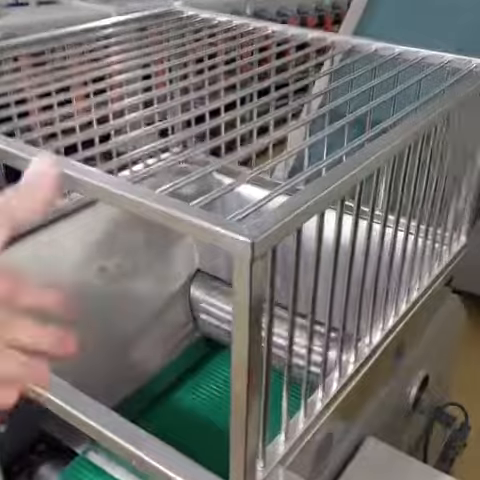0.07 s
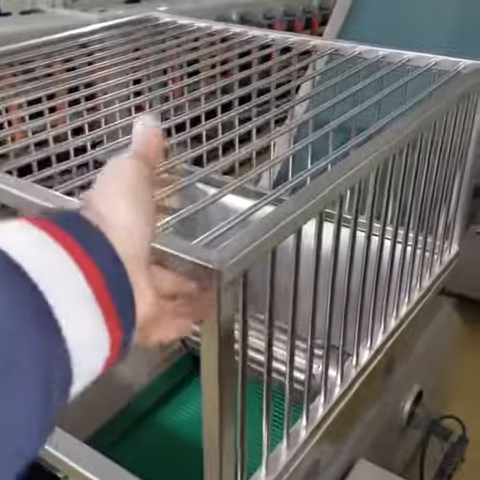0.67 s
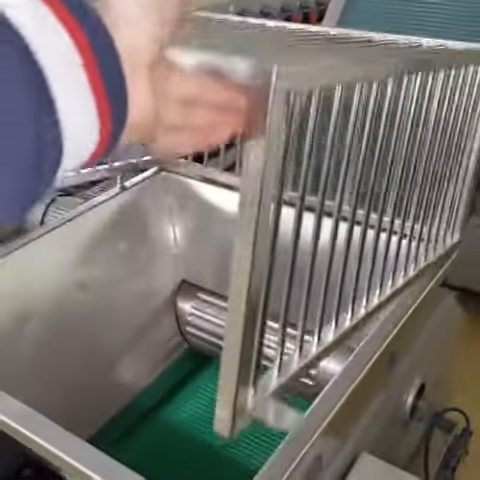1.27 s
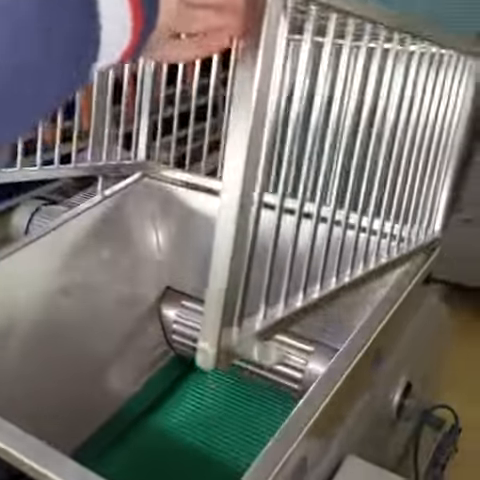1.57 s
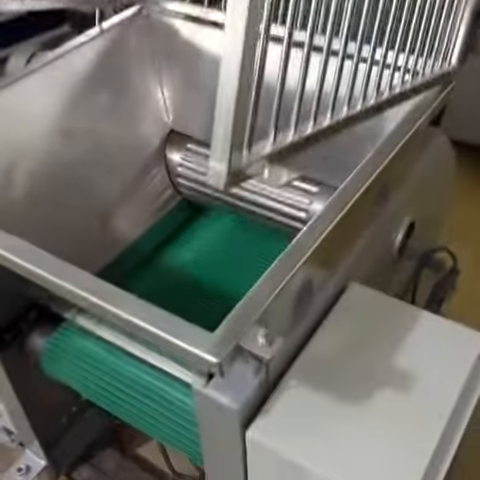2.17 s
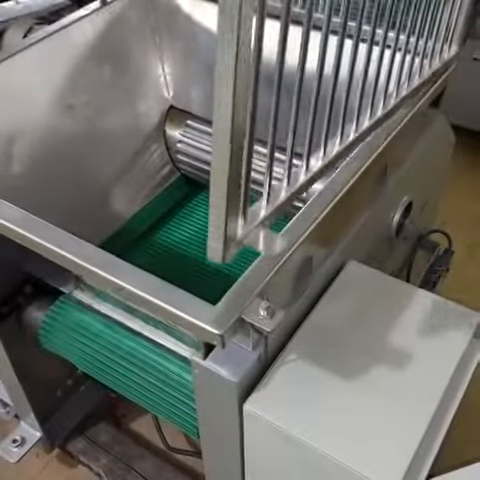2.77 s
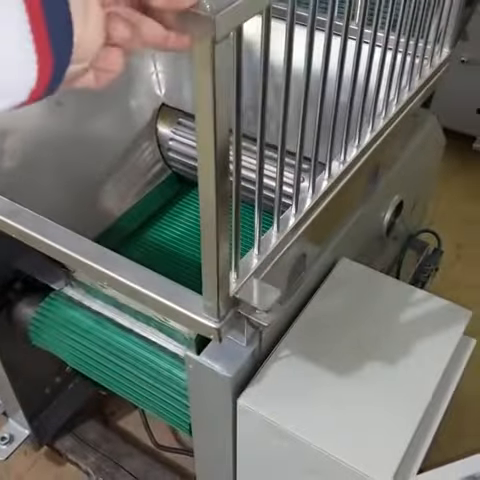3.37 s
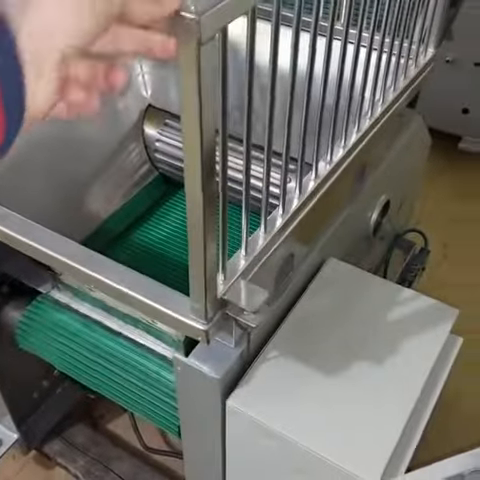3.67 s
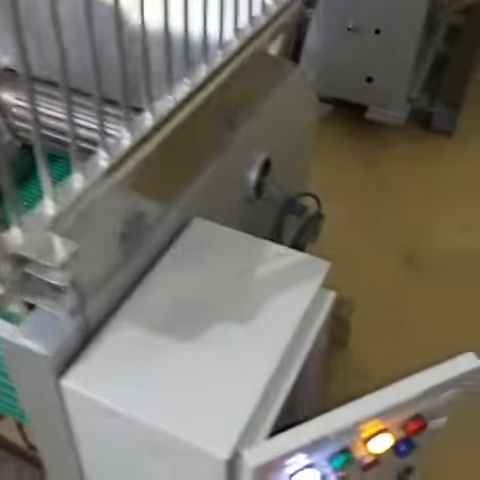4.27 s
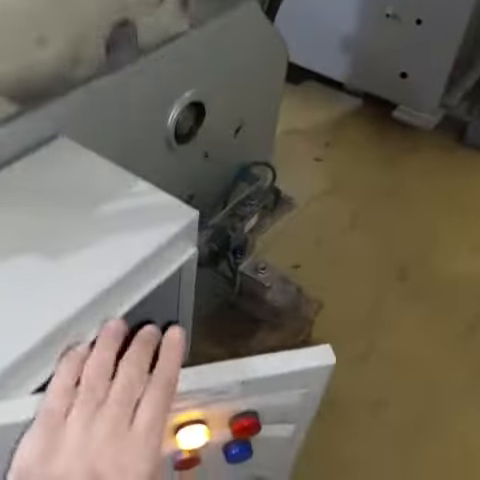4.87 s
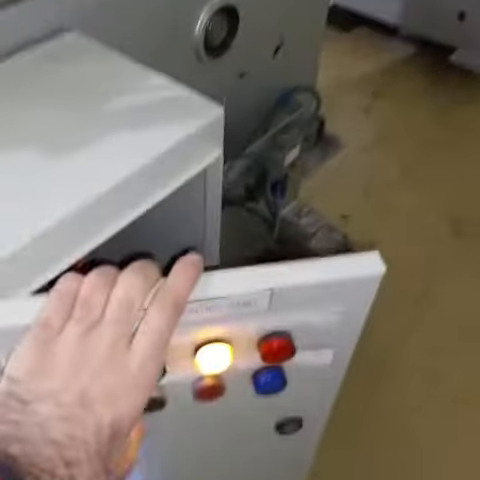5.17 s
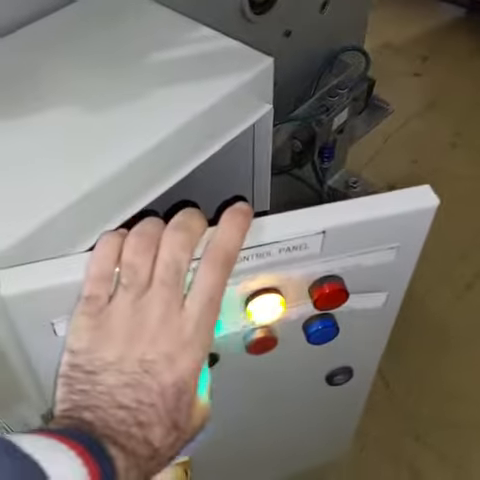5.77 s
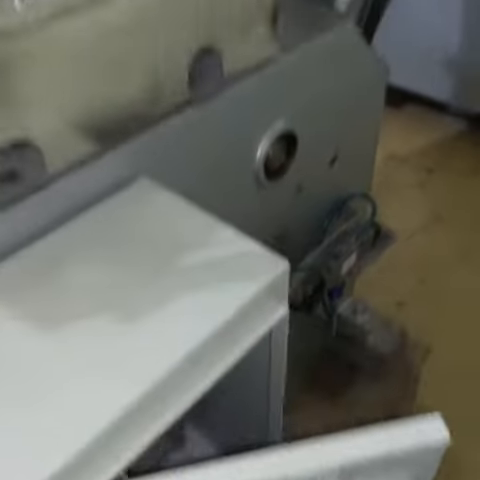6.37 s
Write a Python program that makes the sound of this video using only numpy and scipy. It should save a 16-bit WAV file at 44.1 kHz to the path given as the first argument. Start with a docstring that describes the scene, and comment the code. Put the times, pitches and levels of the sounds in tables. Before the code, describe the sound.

An industrial machine hums close by in a hard-walled workshop, with a jacket sleeve brushing past and a light rasp from the belt. At about 0.9 seconds a contactor snaps out, leaving a bright, noisy ring and a low thump, and the drive coasts to rest by 1.5 seconds. Quiet room rumble and distant motors remain. A faint hiss comes briefly around 2.8 seconds. At 3.1 seconds a barred steel guard falls shut with a loud clang, rebounds lightly and rings for over a second. The sleeve swishes again at 3.5 seconds. A low mains hum swells around 4.6 seconds, and from 5.2 seconds the faint hiss returns with a thin whistle inside it. At 5.8 seconds a push button clicks, the contactor clacks in and the drive growls back up to speed, humming on with a little cloth rustle until about 6.5 seconds.

```python
"""A laminating machine hums in a hard-walled workshop; a sleeve brushes past and the belt rubs its guide.
As the steel guard is lifted the contactor snaps out, a bright, noisy ring with a low thump dies away
and the drive coasts down. A faint hiss switches on and off, then the guard falls shut with a long clang.
The sleeve brushes again, mains hum swells and the hiss returns, a thin whistle growing inside it.
A push button clicks, the contactor pulls in and the drive growls back up to speed."""
import sys
import numpy as np
from scipy import signal
from scipy.fft import rfft, irfft, next_fast_len
from scipy.io import wavfile

SR = 44100
rng = np.random.default_rng(int(sys.argv[2]) if len(sys.argv) > 2 else 0)


def waveform_to_disk(signal):
    """Save audio, clipped to [-1, 1], as 16-bit WAV at the path in sys.argv[1]."""
    frames = np.transpose(np.atleast_2d(signal))
    scaled = np.clip(frames, -1, 1) * 32767
    samples = np.round(scaled).astype(np.int16)
    wavfile.write(sys.argv[1], SR, samples)


N = 283563
TIME = np.arange(N) / SR
CUT_S, RESTART_S = .93, 5.82  # the drive loses power and gets it back
# how alike the hall sounds left and right: f/Hz, likeness/0-1
STEREO_LIKENESS = [(60, 0.99), (250, 0.92), (450, 0.87), (900, 0.09), (1800, 0.01), (15000, 0.1)]


def amp(db):
    """Decibels to gain."""
    return 10 ** (np.asarray(db) / 20)


def unit(x):
    """Scales to rms 1."""
    return x / np.sqrt(np.mean(x ** 2) + 1e-20)


def read(points, hz):
    """Reads a curve on a log-frequency axis."""
    f, value = np.transpose(points)
    return np.interp(np.log(hz + 1), np.log(f + 1), value)


def add(mix, s, sound):
    """Mixes a sound in at time s."""
    part = mix[:, round(s * SR):][:, :sound.shape[1]]
    part += sound[:, :part.shape[1]]


def swell(peak_s, rise_s, fall_s):
    """A rounded swell of height 1 with exponential flanks."""
    t = TIME - peak_s
    return 1 / np.cosh(np.minimum(abs(t) / np.where(t < 0, rise_s, fall_s), 60))


def onset(s, rise_s):
    """An attack that climbs from 0 towards 1 after time s."""
    return 1 - np.exp(-np.maximum(TIME - s, 0) / rise_s)


def fade(t, t60):
    """Exponential decay, 60 dB down at t60."""
    return np.exp(-np.log(1000) * t / np.maximum(t60, 1e-3))


def drift(rate_hz):
    """Smooth random modulation of rms 1."""
    n = next_fast_len(N // 32)
    hz = np.fft.rfftfreq(n, TIME[-1] / n)
    slow = irfft(rfft(rng.standard_normal(n)) * np.exp(-(hz / rate_hz) ** 2), n)
    return np.interp(TIME, np.linspace(0, TIME[-1], n), unit(slow))


def noise(spectrum, size=N):
    """Coloured stereo noise of rms 1, centred in the bass and wide in the treble."""
    n = next_fast_len(size)
    hz = np.fft.rfftfreq(n, 1 / SR)
    a, b = rfft(rng.standard_normal((2, n)))
    same = np.clip(read(STEREO_LIKENESS, hz), -1, 1)
    low_cut = 1 / np.sqrt(1 + (spectrum[0][0] / (hz + 1)) ** 12)
    pair = np.array([a, same * a + np.sqrt(1 - same ** 2) * b])
    return unit(irfft(pair * amp(read(spectrum, hz)) * low_cut, n)[:, :size])


def tone(hz, t, wander=0):
    """A stereo sine of rms 1, wider in the treble; wander bends its phase, in radians."""
    apart = np.arccos(np.clip(read(STEREO_LIKENESS, hz), -1, 1)) * rng.choice([-1, 1])
    return np.sqrt(2) * np.sin(2 * np.pi * (hz * t + rng.random()) + wander + np.array([[0], [apart]]))


def panels(x, share, count=8):
    """Flat steel panels close by throw early echoes that comb the treble."""
    size = x.shape[1]
    n = next_fast_len(size)
    hz = np.fft.rfftfreq(n, 1 / SR)
    delay_s = rng.uniform(.0006, .012, (count, 2, 1))
    sign = rng.choice([-1, 1], (count, 2, 1))
    echoes = (sign * np.exp(-2j * np.pi * hz * delay_s)).sum(0) / np.sqrt(count)
    mirrored = share * hz / (hz + 900)  # long waves bend round the panels
    return irfft(rfft(x, n) * (1 + mirrored * echoes) / np.sqrt(1 + mirrored ** 2), n)[:, :size]


def burst(spectrum, t60, rise_s):
    """A noise transient: hard parts chatter for an instant as they meet."""
    t = np.arange(SR // 2) / SR
    return noise(spectrum, size=len(t)) * fade(t, t60) * (1 - np.exp(-t / rise_s))


def struck(modes, rise_s):
    """The strong modes of a struck body: two seconds of dying sines."""
    t = np.arange(2 * SR) / SR
    return sum(amp(db) * tone(hz, t) * fade(t, t60) for hz, db, t60 in modes) * (1 - np.exp(-t / rise_s))


def ring(spectrum, t60s, rise_s):
    """The many weak modes of a steel body merge with the hall; each band dies at its own rate."""
    t = np.arange(2 * SR) / SR
    wash = panels(noise(spectrum, size=len(t)), share=.7)
    hz, frame_s, bands = signal.stft(wash, SR, nperseg=512)
    bands = bands * fade(frame_s, read(t60s, hz)[:, None])
    tail = signal.istft(bands, SR)[1][:, :len(t)]
    return tail * (1 - np.exp(-t / rise_s))


def workshop():
    """Room tone: hall rumble, far motors that dip once, mains hum as the control cabinet passes close."""
    # drone of distant motors: f/Hz, level/dB
    far_motors = [(75.4, -46.5), (215.3, -51.5), (274.5, -56)]
    # noise spectrum of the hall: f/Hz, level/dB
    rumble = [(33, -6), (45, -4.5), (75, -4.5), (110, -8.5), (160, -12.5), (210, -10.5), (282, -13),
              (400, -19.5), (686, -30.5), (1000, -34), (2100, -42), (3200, -51.5), (4300, -54.5),
              (5900, -68.5), (9000, -63.5), (15500, -64)]
    motors = sum(amp(db) * tone(hz, TIME, 0.86 * drift(4.7)) for hz, db in far_motors)
    nearness = swell(peak_s=4.65, rise_s=.27, fall_s=.33)
    mains = amp(-35.5) * nearness * tone(47.5, TIME, 0.085 * drift(1.9))
    lull = swell(peak_s=3.76, rise_s=.22, fall_s=.3)
    hall = panels(noise(rumble), share=0.88) * amp(-41 + 0.5 * lull)
    return hall + motors * amp(-14 * lull) + mains


def drive():
    """The drive labours up to speed, turns steadily and coasts to rest when the power is cut."""
    # runs, the first already under way: on/s, off/s, hum/dB, whine/dB, shake/dB, treble/dB
    runs = [(-3.5, CUT_S, -31, -50.5, -70, -40), (RESTART_S, 7, -33, -62, -29.5, -35)]
    current_run = np.searchsorted([run[0] for run in runs], TIME) - 1
    on_s, off_s, hum_db, whine_db, shake_db, treble_db = np.array(runs)[current_run].T
    spin_up_s, coast_s = 0.15, 0.55
    speed = onset(on_s, spin_up_s) * np.clip(1 - (TIME - off_s) / coast_s, 0, 1)
    strain = onset(on_s, 0.036) * (1 - onset(on_s, 0.19))
    rub = swell(peak_s=.48, rise_s=.32, fall_s=.11) * speed  # the belt touches its guide once
    return (gears(speed, strain, rub, treble_db) + drop_out_ring(off_s)
            + motor(speed, strain, hum_db, shake_db) + bearing_and_belt(speed, rub, whine_db))


def gears(speed, strain, rub, treble_db):
    """Rolling noise brightens with speed and belt rub; the gears growl under strain."""
    # noise spectrum of running gears and rollers: f/Hz, level/dB
    rollers = [(110, -16.5), (165, -20), (206, -8), (260, -12), (330, -8.5), (400, -17), (620, -25.5),
               (1000, -27), (2600, -32.5), (3200, -36), (4400, -33.5), (6600, -49), (9000, -45),
               (15500, -50.5)]
    # noise spectrum of gears straining to get moving: f/Hz, level/dB
    straining_gears = [(120, -4), (190, 1), (260, 1), (330, -1.5), (450, -8), (800, -6), (1200, -16.5),
                       (1800, -36), (4000, -45), (9000, -38), (15000, -48)]
    rolling = panels(noise(rollers), share=1.0) * amp(0.95 * drift(39))
    dull = signal.sosfiltfilt(signal.butter(2, 1500, fs=SR, output="sos"), rolling)
    body = dull * amp(-34.5) * speed ** 0.79
    treble = (rolling - dull) * (amp(treble_db) * speed ** 3.1 + amp(-31.5) * rub)
    growl = amp(-22) * strain * panels(noise(straining_gears), share=0.75) * amp(1.1 * drift(41))
    return (body + treble + growl) * amp([[-1.5], [1.2]])  # panned a little right


def motor(speed, strain, hum_db, shake_db):
    """The motor's hum swells once and wavers under strain; the frame shakes as it takes up load."""
    # steady tones of the running drive: f/Hz, level/dB
    partials = [(107.7, -45), (205, -39.5), (430.7, -51.5), (538.3, -55), (936.7, -58.5), (990.5, -55),
                (1227, -62), (1335, -70), (1410, -56), (1997, -64), (2213, -67), (3790, -61), (4285, -72)]
    hum_hz, shake_hz = 322.5, 55.8
    wander = 0.044 * drift(11) + 0.5 * np.sqrt(strain) * drift(23.7)
    swell_db = 7.5 * swell(peak_s=.73, rise_s=.35, fall_s=.1)
    hum = amp(hum_db + swell_db) * speed ** 0.74 * tone(hum_hz, TIME, wander)
    tones = speed ** 0.98 * sum(amp(db) * tone(hz, TIME, 0.31 * drift(6.1)) for hz, db in partials)
    shake = amp(shake_db) * speed ** 3.1 * tone(shake_hz, TIME, 0.11 * drift(6))
    return hum * amp([[-2.0], [1.6]]) + tones + shake


def bearing_and_belt(speed, rub, whine_db):
    """Near full speed a bearing sings in quick uneven pulses; the belt rasps where it rubs."""
    # narrow noise band of the belt on its guide: f/Hz, level/dB
    rasp_band = [(1200, -56), (1850, -14), (2150, -5), (2450, -13), (3000, -27), (8000, -50)]
    whine_hz = 2655
    flutter = 1 + 0.88 * np.tanh(1.7 * drift(35))
    whine = amp(whine_db) * speed ** 4 * tone(whine_hz, TIME, 0.99 * drift(31)) * flutter
    rasp = noise(rasp_band) * amp(-45.5) * rub * amp(2.1 * drift(45))
    return (whine + rasp) * amp([[-4], [2]])  # panned right


def sleeve():
    """Cloth slides in small uneven slips, one swell for each move of the arm."""
    # moves of the arm, timed at their fastest: t/s, rise/s, fall/s, level/dB
    arm_moves = [(.2, .11, 0.074, -44.5), (0.801, 0.13, 0.14, -49), (1.75, 0.36, 0.33, -69.5),
                 (2.15, 0.12, 0.23, -80), (3.51, 0.042, 0.1, -41), (3.73, 0.025, 0.038, -55),
                 (4.0, 0.062, 0.065, -74), (4.82, .23, 0.21, -56.5), (6.42, 0.21, .2, -46)]
    # noise spectrum of a jacket sleeve: f/Hz, level/dB
    cloth = [(400, 9), (1500, 7.5), (3000, 1), (5000, -0.5), (6300, -9), (7700, -5.5), (10000, -7),
             (12500, -1), (15500, -10)]
    moving = sum(amp(db) * swell(s, rise_s, fall_s) for s, rise_s, fall_s, db in arm_moves)
    return panels(noise(cloth), share=0.96) * moving * amp(drift(120))


def contactor():
    """The contactor snaps out, later in; each blow pings its springs and rings the control cabinet."""
    # blows: t/s, snap/dB, ring/dB, modes over the ring/dB
    blows = [(0.9204, -27, -32.5, 6), (0.9429, -22, -35, -5), (5.8125, -19, -28.5, 19.5),
             (5.819, -23.5, -33.5, 1)]
    # noise spectrum of the snapping contacts: f/Hz, level/dB
    snap = [(200, -15), (700, 11.5), (1500, 6.5), (1950, 6.5), (2350, 5), (3200, -0.5), (5100, 3.5),
            (6300, -5.5), (8700, -8), (10300, -9.5), (12500, -1.5), (15500, -21)]
    # pings of the steel contact springs: f/Hz, level/dB, t60/s
    springs = [(2330, 2, 0.055), (2370, -12, .08), (3040, -14, .06), (5140, -14, 0.055), (7100, -25, 0.073),
               (8250, -16, 0.05), (11900, -25, .06)]
    # strong modes of the cabinet: f/Hz, level/dB, t60/s
    modes = [(158.4, -24.5, 2.4), (187.7, -24, 1.2), (207, -45, 0.83), (295, -42, 1.3), (324, -29, 4.7),
             (365, -15.5, 0.17), (462, -41, 1.24), (530, -34, 2.1), (710, -34, 1.6), (806, -30, 1.9)]
    # tail of the cabinet ringing with the hall: f/Hz, level/dB
    tail = [(65, -45), (110, -21), (192, -4.5), (247, -3.5), (316, -1.5), (542, -22.5), (680, -18.5),
            (928, -21), (1170, -21), (1270, -15), (1840, -19.5), (5510, -26), (15500, -38)]
    # decay of that tail: f/Hz, t60/s
    decay = [(150, 1.4), (400, 1.13), (1500, 1.65), (4500, 1.27), (8000, 0.73), (14000, 1.22)]
    out = np.zeros((2, N))
    for s, snap_db, ring_db, modes_db in blows:
        add(out, s, amp(snap_db) * burst(snap, t60=0.071, rise_s=0.0014))
        add(out, s, amp(snap_db - 12.5) * struck(springs, rise_s=.0005))
        body = ring(tail, decay, rise_s=0.0017) + amp(modes_db) * struck(modes, rise_s=0.017)
        add(out, s, amp(ring_db) * body)
    return out


def ticks():
    """Contacts, latch and push button tick sharply as their small parts meet."""
    # tick cues: t/s, level/dB, t60/s
    cues = [(.9222, -38, 0.023), (.9438, -26, 0.019), (3.249, -36, .12), (3.258, -45, .1),
            (3.728, -55, 0.15), (5.0173, -63, 0.038), (5.2644, -66, 0.091), (5.7937, -30.5, 0.07),
            (5.8126, -18, 0.04), (6.029, -45, 0.28)]
    # noise spectrum of a tick: f/Hz, level/dB
    spectrum = [(500, -26), (1700, -8), (2400, -0.5), (3200, -22), (5000, -6), (8000, -5.5), (10500, -7),
                (12500, -4), (15500, -16)]
    out = np.zeros((2, N))
    for s, db, t60 in cues:
        add(out, s, amp(db) * burst(spectrum, t60, rise_s=0.00018))
    return out


def drop_out_ring(off_s):
    """A bright, noisy ring with a low thump dies away after the contactor snaps out."""
    # noise spectrum of the thump and ring: f/Hz, level/dB
    spectrum = [(130, -15), (200, 8), (300, 3), (500, -17), (1900, -16), (2900, -11), (4000, -14),
                (5200, -17.5), (6800, -51), (15000, -47)]
    envelope = onset(off_s, 0.006) * (1 - onset(off_s, 0.14))
    ringing = panels(noise(spectrum), share=0.8) * amp(1.8 * drift(90))
    return amp(-29.5) * envelope * ringing * amp([[-1.5], [1.2]])  # panned a little right


def faint_hiss():
    """A faint hiss switches on twice, with a thin whistle growing inside it."""
    # hiss cues: t/s, rise/s, length/s, level/dB
    cues = [(2.752, 0.01, 0.26, -56.5), (5.192, 0.065, .66, -55.5)]
    # noise spectrum of the hiss: f/Hz, level/dB
    hiss = [(300, -10), (900, 1.5), (1600, 0), (2250, 0.5), (3200, -2), (3750, -2), (4200, -4.5),
            (4600, -8.5), (5300, -12.5), (6200, -24), (9000, -25.5), (15000, -23)]
    # noise spectrum of the whistle: f/Hz, level/dB
    whistle = [(1600, -26.5), (1950, -16), (2150, -5), (2400, -14.5), (3400, -19), (3950, -7.5),
               (4200, -0.5), (4450, -11), (4720, -9), (5000, -25), (9000, -64.5)]
    release_s, grow_s = .08, .7
    hiss_gain, whistle_gain = 0, 0
    for s, rise_s, length_s, db in cues:
        envelope = onset(s, rise_s) * (1 - onset(s + length_s, release_s))
        hiss_gain += amp(db) * envelope
        whistle_gain += amp(-50.5) * envelope * onset(s, grow_s)
    return panels(noise(hiss), share=0.47) * hiss_gain + noise(whistle) * whistle_gain


def guard():
    """The barred steel guard clangs onto the frame, one corner first, and rebounds once."""
    # blows: t/s, contact/dB, ring/dB
    blows = [(3.077, -20.5, -37.5), (3.0803, -13, -17), (3.25, -30, -38.5)]
    # noise spectrum of the contact: f/Hz, level/dB
    crack = [(125, -7.5), (170, 6), (260, 11), (500, 0.5), (1000, 1), (2200, -0.5), (4000, -1), (7000, -8),
             (11000, -10.5), (15500, -8)]
    # strong modes of guard and frame: f/Hz, level/dB, t60/s
    modes = [(104.4, -36.5, 4.6), (153.6, -24, 1.57), (160.4, -20, 0.78), (186.6, -25.5, 1.1),
             (200, -18.5, 1.14), (221.2, -26, 3.2), (237, -23, 3.2), (300, -21.5, 1.78),
             (322.3, -24.5, 2.1), (331, -27.5, 2.17), (369.4, -21, 0.37), (377, -37.5, 0.78),
             (429, -32, 2.8), (484, -33, 2.2), (514, -46, 2.4), (538, -33, 1.9), (544, -44, 2.9),
             (691, -32, 1.62), (783, -37, 1.5), (740, -39.5, 0.89), (1246, -45.5, 0.97),
             (1427, -30.5, 0.76), (1515, -36, 1.7), (1780, -35.5, 0.54), (2320, -44, 0.71),
             (2805, -35.5, 1.1), (3200, -36, 0.57), (3160, -46, 1.0)]
    # short thud of the frame's heavy panels: f/Hz, level/dB, t60/s
    thud = [(174.6, -36, .45), (206.5, -11, 0.21), (308, -32.5, .4), (520, -16, 0.11), (800, -30, 0.86)]
    # tail of dense, weaker modes: f/Hz, level/dB
    tail = [(53, -41.5), (90, -25.5), (195, -4), (321, -6.5), (389, -6.5), (810, -14.5), (864, -18),
            (1450, -19), (1610, -20.5), (2770, -22), (3660, -28), (4950, -31), (9440, -41), (12500, -37.5),
            (15500, -48.5)]
    # decay of that tail: f/Hz, t60/s
    decay = [(120, 1.9), (240, 2.27), (350, 2.2), (700, 1.83), (1800, 1.645), (4800, 1.45), (8000, 1.46),
             (14000, 1.23)]
    out = np.zeros((2, N))
    for s, contact_db, ring_db in blows:
        add(out, s, amp(contact_db) * burst(crack, t60=0.18, rise_s=.0005))
        body = ring(tail, decay, rise_s=0.0025) + amp(15.5) * struck(modes + thud, rise_s=0.0015)
        add(out, s, amp(ring_db) * body)
    return out


def scene():
    """The workshop ambience with the machine and the sleeve in front."""
    ambience = workshop() + faint_hiss()
    return ambience + drive() + sleeve() + guard() + contactor() + ticks()


def record(dry):
    """Two small microphones of slightly different colour, gentle overload, then a high cut."""
    # colour of both microphones: f/Hz, level/dB
    colour = [(100, -1.5), (2400, 2), (3200, -0.5), (4400, 1.5), (5300, 4), (6200, 2.5), (7500, 4.5),
              (15000, 2)]
    # balance, left minus right: f/Hz, level/dB
    balance = [(50, -1), (250, -1.5), (550, 0.5), (1100, 0), (2300, -3.5), (4500, -2), (8000, 2.5),
               (13000, -3)]
    hz = np.fft.rfftfreq(N, 1 / SR)
    tint = amp(read(colour, hz) + np.array([[.5], [-.5]]) * read(balance, hz))
    tinted = irfft(rfft(dry) * tint, N)
    saturated = tinted / (1 + (tinted / .95) ** 6) ** (1 / 6)
    high_cut = signal.firwin(401, 15900, window=("kaiser", 9), fs=SR)
    return signal.oaconvolve(saturated, high_cut[None], "same")


dry = scene()
out = record(dry)
waveform_to_disk(out)
```